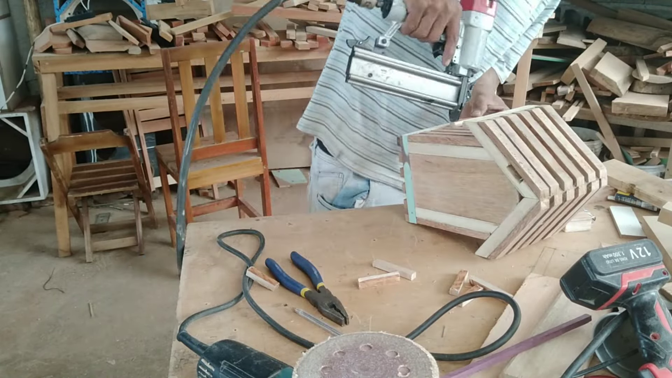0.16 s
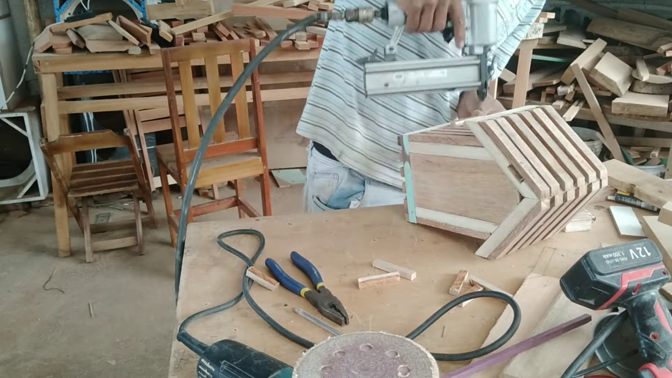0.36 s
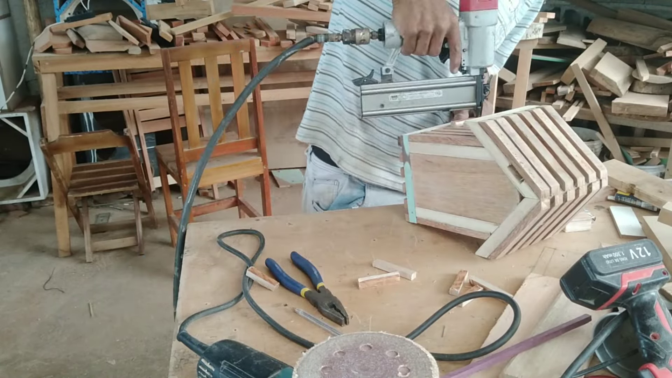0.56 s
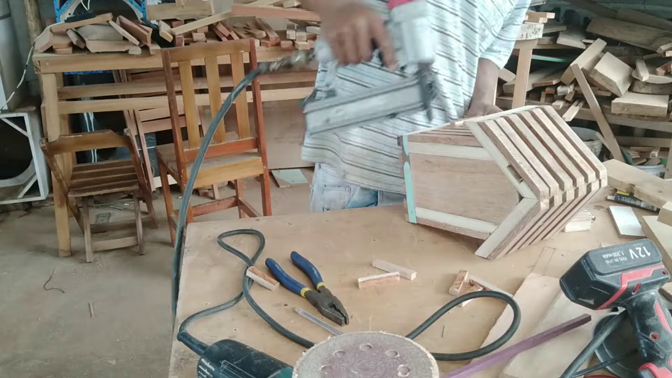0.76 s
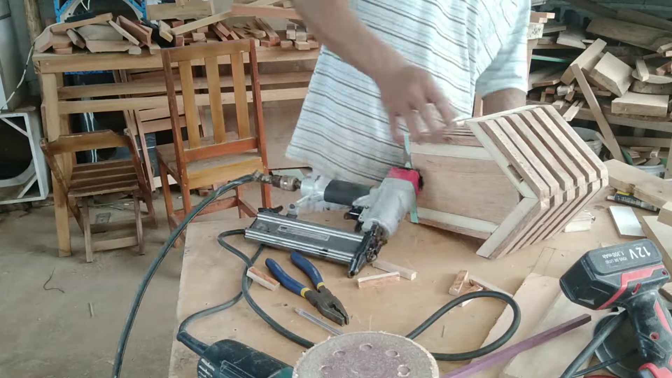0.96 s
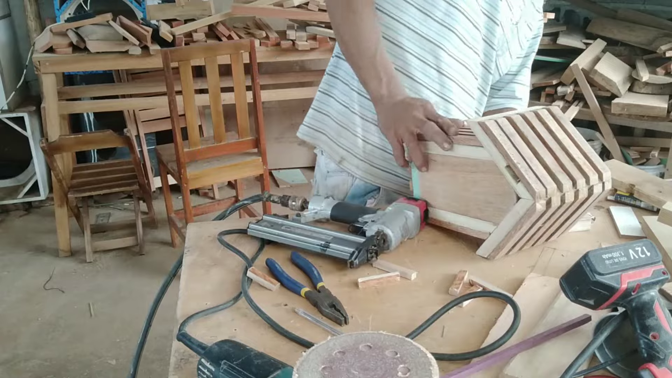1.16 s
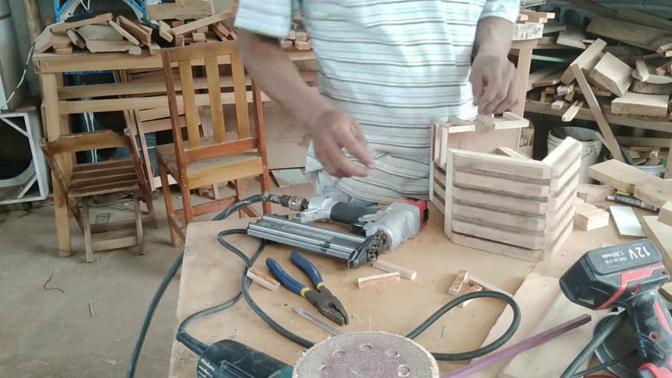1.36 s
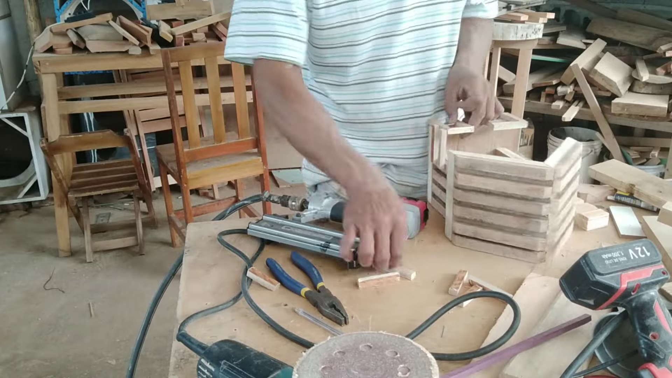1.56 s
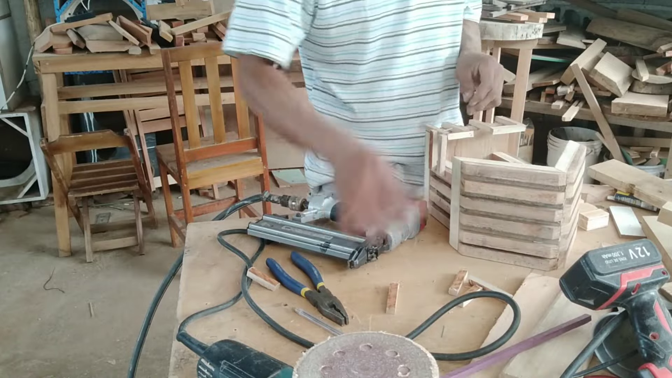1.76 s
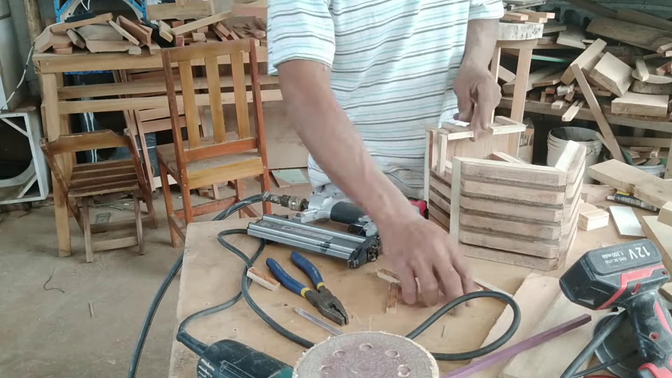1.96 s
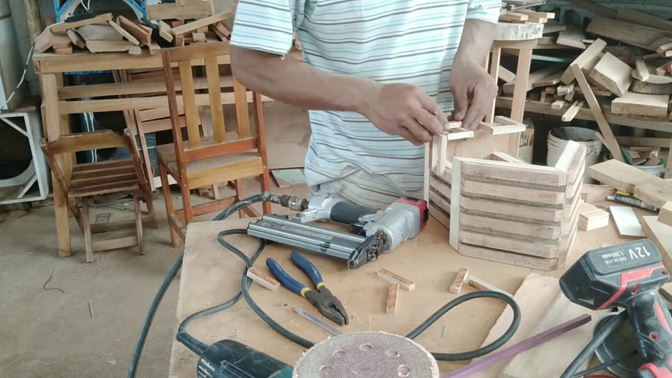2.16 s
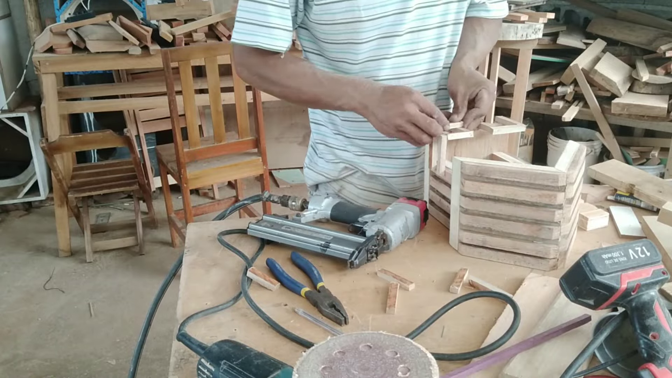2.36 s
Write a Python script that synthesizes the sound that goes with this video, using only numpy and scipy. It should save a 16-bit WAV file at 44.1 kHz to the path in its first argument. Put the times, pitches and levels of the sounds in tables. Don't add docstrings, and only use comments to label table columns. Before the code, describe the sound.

A pneumatic nailer fires twice, close and overloading, with hissing air and short shed echoes; it clunks onto the bench, then a slatted wooden box tips and lands with hollow knocks and rattling over faint machine rumble.

```python
import sys
import numpy as np
from scipy import signal
from scipy.fft import rfft, irfft
from scipy.io import wavfile
from scipy.ndimage import uniform_filter1d

SR = 44100
rng = np.random.default_rng(int(sys.argv[2]) if len(sys.argv) > 2 else 0)


def amplitude_ratio(level_db):
    exponent = np.asarray(level_db, float) / 20
    return 10 ** exponent


def dump(signal):
    limited = np.clip(np.atleast_2d(signal).T, -1, 1)
    pcm = np.round(limited * 32767).astype(np.int16)
    wavfile.write(sys.argv[1], SR, pcm)


N = 110250


def read(points, hz, axis=1):
    points = np.array(points)
    return np.interp(np.log(hz + 1), np.log(points[:, 0] + 1), points[:, axis])


def evened(x):
    return x / np.sqrt(np.mean(x ** 2) + 1e-20)


def add(mix, start_s, sound):
    part = mix[:, round(start_s * SR):][:, :sound.shape[1]]
    part += sound[:, :part.shape[1]]


def coloured(x, colour, peaks=(), lift_db=0):
    hz = abs(np.fft.fftfreq(4096, 1 / SR))
    level_db = read(colour, hz)
    for peak_hz, width_hz in peaks:
        level_db = level_db + lift_db / (1 + (2 * (hz - peak_hz) / width_hz) ** 2)
    log_gain = np.log(amplitude_ratio(level_db))
    phase = -signal.hilbert(log_gain).imag
    taps = np.fft.ifft(np.exp(log_gain + 1j * phase)).real[:2048]
    return evened(signal.oaconvolve(x, taps[None], axes=1)[:, 2048:x.shape[1]])


def piece(row, colour, grit, clicks_per_s, edge_s, dull_db, peaks=(), lift_db=0):
    start, length, level_db, change_db = row
    t = np.arange(0, length + 2 * edge_s, 1 / SR)
    air, size = rng.standard_normal((2, 2, 12288))
    struck = rng.random(12288) < clicks_per_s / SR
    clicks = size * struck * np.sqrt(SR / clicks_per_s)
    source = (1 - grit) * air + grit * clicks
    sound = coloured(source[:, :len(t) + 2048], colour, peaks, lift_db)
    low = signal.sosfiltfilt(signal.butter(2, 3500, fs=SR, output="sos"), sound)
    sound = low + (sound - low) * amplitude_ratio(dull_db * (.5 - t / length))
    gate = np.clip(np.minimum(t, t[-1] - t) / (2 * edge_s), 0, 1)
    return start - edge_s, sound * gate * amplitude_ratio(level_db + change_db * t / length)


def knock(start, level_db, ring_hz, t60):
    t = np.arange(0, t60, 1 / SR)
    hz = ring_hz * np.array([[1], [1.07]])
    overtone = np.sin(2 * np.pi * 2.4 * hz * t) * amplitude_ratio(-90 * t / t60)
    body = np.sin(2 * np.pi * hz * t) + .5 / (1 + ring_hz / 500) * overtone
    onset = 1 - np.exp(-(t * ring_hz * 5) ** 2)
    return start, body * amplitude_ratio(level_db - 60 * t / t60) * onset


def tones(start, length, lines, waver):
    t = np.arange(0, length, 1 / SR)
    bend = t + waver * np.sin(2 * np.pi * 14 * t) / 14
    out = 0
    for hz, level_db in lines:
        out = out + amplitude_ratio(level_db + 9) * np.sin(2 * np.pi * (hz * bend + rng.random((2, 1))))
    flutter = 1 + 0.28 * evened(uniform_filter1d(rng.standard_normal(len(t)), size=400))
    return start, out * flutter * np.sin(np.pi * t / length) ** 1.1


def pieces(rows, *how):
    out = np.zeros((2, N))
    for row in rows:
        add(out, *piece(row, *how))
    return out


def knocks(rows):
    out = np.zeros((2, N))
    for row in rows:
        add(out, *knock(*row))
    return out


def lumps(width):
    return evened(uniform_filter1d(uniform_filter1d(rng.standard_normal(N), width), width))


# time in seconds, level in dB.
MACHINE = [(0, -47.5), (.7, -50), (1.02, -50), (1.09, -78.5), (1.25, -78), (1.39, -68), (1.42, -79),
           (1.54, -72.5), (1.6, -61), (1.68, -60), (1.72, -61.5), (1.78, -57.5), (1.82, -56.5), (1.93, -59),
           (1.97, -54), (2.03, -68.5), (2.09, -87), (2.5, -82)]
# frequency in Hz, level in dB.
MACHINE_COLOUR = [(150, -28), (300, -13), (560, -8), (1200, -10.5), (2600, -13), (3100, -19.5),
                  (6000, -33.5), (7500, -41), (14000, -58)]
SHED = [(20, -8.5), (35, -16), (70, -7.5), (170, -18.5), (350, -28), (800, -30), (1000, -42.5),
        (2600, -56.5), (3500, -76), (16000, -83.5)]
# frequency in Hz, width in Hz.
CASING = [(565, 45), (1280, 100), (2480, 310)]


def far_machine():
    level_db = np.interp(np.arange(N) / SR, *np.transpose(MACHINE))
    hiss, rumble = rng.standard_normal((2, 2, N + 2048))
    rumble_db = -48 + 0.12 * (level_db - level_db.min()) + 0.61 * lumps(1500)
    out = coloured(hiss, MACHINE_COLOUR, CASING, 4.0) * amplitude_ratio(level_db + 4 + 1.1 * lumps(500))
    return out + coloured(rumble, SHED) * amplitude_ratio(rumble_db)


# start in seconds, length in seconds, level in dB, change over the length in dB.
FAR = [
    (.102, 0.042, -44.5, -1.5),
    (.438, 0.012, -43, -14.5),
    (1.548, 0.024, -61.5, 9),
    (1.742, 0.02755, -41, 0.5),
    (1.9418, 0.0187, -35, 2),
]
# frequency in Hz, level in dB.
FAR_COLOUR = [(150, -51), (400, 2.5), (2000, -2), (4400, -16.5), (5200, -13.5), (7500, -35.5), (9500, -30),
              (12500, -71)]
# start in seconds, length in seconds, level in dB, change in dB.
TICKS = [
    (.44, .004, -58, -3),
    (1.9435, .003, -46, -3),
    (2.449, .004, -72, -3),
]


def far_shots():
    out = pieces(FAR, FAR_COLOUR, 0.56, 1300, 0.0017, 1.9)
    for row in TICKS:
        add(out, *piece(row, FAR_COLOUR if row[0] > 1 else VALVE, 0.51, 1400, .001, .1))
    return out


# start in seconds, length in seconds, partial in Hz, level in dB.
HORN = [
    (2.413, .058, 760, -58),
    (2.425, .037, 1490, -65),
    (2.462, .033, 1490, -68),
    (2.45, .04, 1116, -75),
]


def far_horn():
    out = np.zeros((2, N))
    for start, length, hz, level_db in HORN:
        add(out, *tones(start, length, [(hz, level_db)], .003))
    return out


# start in seconds, length in seconds, level in dB, change in dB.
SETTLING = [
    (1.09, 0.169, -55.5, -3.5),
    (1.388, 0.15, -67.5, 8.5),
    (2.012, 0.066, -56.5, -3.5),
    (2.249, 0.026, -61.5, 1.5),
    (2.429, 0.05, -58.5, -4),
]
# frequency in Hz, level in dB.
SETTLING_COLOUR = [(200, -15), (500, -2.5), (1000, -5.5), (1700, -13), (2600, -35.5), (4000, -49)]


def box_settling():
    return pieces(SETTLING, SETTLING_COLOUR, 0.19, 300, 0.016, .1)


# start in seconds, length in seconds, level in dB, change in dB.
RATTLES = [
    (1.027, 0.028, -22, 0.5),
    (1.056, 0.043, -28.5, -18),
    (1.259, 0.063, -42.5, 2.5),
    (1.3, 0.02, -26, 3.5),
    (1.323, .028, -17.5, -2),
    (1.353, 0.033, -32, -11.5),
    (1.586, 0.038, -43.5, 4),
]
# frequency in Hz, level in dB.
RATTLE = [(30, -34.5), (60, 0), (230, -4.5), (1000, -17.5), (2100, -26.5), (4300, -43.5), (6000, -47),
          (9500, -60), (14000, -88)]


def slat_rattles():
    slats = [(610, 55), (980, 35), (2100, 80)]
    return pieces(RATTLES, RATTLE, 0.5, 330, 0.0023, -2, slats, 6.1)


# start in seconds,
# level in dB, ring in Hz, 60 dB decay in seconds.
KNOCKS = [(0.816, -32, 118, 0.087), (.8795, -25.5, 540, 0.0186), (.881, -22, 1080, 0.047),
          (0.8937, -29.5, 475, 0.015), (0.899, -29, 126.3, 0.25), (1.0273, -27.5, 121, .04),
          (1.0285, -25, 1554, 0.021), (1.031, -22.5, 684, 0.027), (1.037, -22.5, 453, 0.016),
          (1.0335, -29, 2010, 0.026), (1.043, -31.5, 2100, 0.02), (1.0475, -14.5, 235, 0.029),
          (1.0522, -22, 120, 0.1), (1.061, -28.5, 603, .03), (1.0627, -22.5, 274, 0.025),
          (1.068, -25.5, 198, 0.036), (1.181, -40, 890, 0.027), (1.263, -22, 640, 0.013),
          (1.268, -33, 665, 0.11), (1.304, -41, 2220, 0.016), (1.3068, -17.5, 617, 0.014),
          (1.317, -11.5, 400, 0.0097), (1.302, -14.5, 127.7, 0.077), (1.323, -7.5, 235, 0.03),
          (1.326, -9, 474.6, 0.032), (1.3265, -6, 186, 0.06), (1.3326, -11.5, 380, 0.018),
          (1.3345, -14.5, 772, 0.037), (1.3437, -9.5, 283, 0.0096), (1.351, -17.5, 332, .02),
          (1.5863, -20.5, 510, 0.0097), (1.944, -31, 1470, .015), (1.951, -34, 2700, .012)]


def box_knocks():
    return knocks(KNOCKS)


# start in seconds, length in seconds, level in dB, change in dB.
LAID = [
    (.8795, 0.0175, -25, -1.01),
]
# frequency in Hz, level in dB.
LAID_COLOUR = [(35, -28.5), (60, 9), (397, -5.5), (1110, -7.5), (1810, -18), (6250, -27.5), (15900, -49)]


def nailer_laid_down():
    return pieces(LAID, LAID_COLOUR, .4, 700, .0012, -5, [(1107, 300), (662, 71)], 6)


# start in seconds, length in seconds.
RING = (.912, .034)
# frequency in Hz, level in dB.
RING_LINES = [(4194, -64.5), (9146, -64.5), (13792, -85)]


def magazine_spring():
    out = np.zeros((2, N))
    add(out, *tones(*RING, RING_LINES, 0.00038))
    return out


# start in seconds, length in seconds, level in dB, change in dB.
ECHOES = [
    (.296, 0.044, -21.5, -28),
    (.7095, 0.053, -25, -32),
]
# frequency in Hz, level in dB.
ECHO = [(35, -33.5), (60, -1.5), (591, -11), (2240, -8.5), (2700, -11.5), (8660, -28), (12000, -42.5),
        (15900, -71)]


def shed_echoes():
    return pieces(ECHOES, ECHO, .1, 900, .0015, 8)


# start in seconds, length in seconds, level in dB, change in dB.
VALVES = [
    (.231, 0.017, -31, 3.5),
    (.2548, 0.017, -24, 0),
    (.652, 0.0073, -30, 4.5),
    (.662, 0.028, -19.5, -4.5),
]
# frequency in Hz, level in dB.
VALVE = [(35, -36.5), (60, -6), (1140, -6), (2040, -5.5), (2820, 3.5), (14100, -19.5), (15900, -32.5)]
RECOIL = [(35, -29.5), (60, 9.5), (397, -11), (1940, -0.5), (3330, -11.5), (7000, -21.5), (10000, -36.5),
          (15900, -56)]


def valves_and_recoils():
    out = pieces(VALVES[0::2], VALVE, 0.41, 1500, .0012, .1)
    return out + pieces(VALVES[1::2], RECOIL, 0.41, 1500, .0012, .1)


# start in seconds, length in seconds, level in dB, change in dB.
BLOW = [
    (.2402, 0.003, -18, 0),
    (.2445, 0.011, -4, -3.5),
]
# frequency in Hz, level in dB.
BLOW_COLOUR = [(35, -32.5), (60, -7), (900, -1.5), (5060, -22), (5960, -19), (7710, -34.5), (15900, -39.5)]
# frequency in Hz, width in Hz.
GUN = [(334, 200), (662, 83), (1330, 230), (1720, 50)]


def driver_blow():
    return pieces(BLOW, BLOW_COLOUR, .4, 900, .0007, 3, GUN, 4)


# start in seconds, length in seconds, level in dB, change in dB.
BLASTS = [
    (.2745, .022, -11.5, -2),
    (.6825, .027, -10, -3.5),
]
# frequency in Hz, level in dB.
BLAST = [(18, -36), (30, -10), (1180, -8), (2000, -9), (2530, -10.5), (8690, -16.5), (13500, -25.5),
         (15900, -46)]


def exhaust_blasts():
    return pieces(BLASTS, BLAST, .45, 600, .0008, 6)


# start in seconds, level in dB, ring in Hz, 60 dB decay in seconds.
SLAMS = [(.2335, -26, 2820, .012), (.2440, -7, 300, .03), (.2445, -8, 900, .03), (.2460, -24, 30, .2),
         (.2475, -8, 5900, .022), (.2505, -8, 1300, .025), (.2775, -12, 260, .03), (.2812, -1, 420, .03),
         (.2823, -4, 1050, .025), (.2885, -7, 1213, .03), (.2935, -14, 2500, .015), (.301, -20, 1300, .02),
         (.6585, -21.5, 2900, .015), (.6622, -14, 1616, .035), (.683, -11, 1260, .02),
         (.6835, -7, 230, .03), (.686, -20, 28, .2), (.689, -12.5, 110, .07), (.6915, -12, 1500, .015),
         (.699, -1, 500, .022), (.7006, -9, 250, .015), (.706, -10, 400, .015)]


def piston_slams():
    return knocks(SLAMS)


# frequency in Hz, likeness from 0 to 1, left over right in dB.
PAIR = [(100.5, 0.82, -0.5), (400, .85, 0.33), (890, 0.31, 5), (2600, 0.3345, 9), (5300, 0.13, -4.5),
        (11850, 0.31, 2.5)]


def scene():
    far = far_machine() + far_shots() + far_horn()
    box = box_settling() + slat_rattles() + box_knocks()
    nailer = nailer_laid_down() + magazine_spring() + shed_echoes() + valves_and_recoils()
    nailer = nailer + driver_blow() + exhaust_blasts() + piston_slams()
    direct, indirect = rfft(far + box + nailer, N + 4096, axis=1)
    hz = np.fft.rfftfreq(N + 4096, 1 / SR)
    same = np.clip(read(PAIR, hz), 0, 1)
    lean = amplitude_ratio(read(PAIR, hz, axis=2) / 2)
    lag_s = 0.00019 * hz / (hz + 300)
    left = direct * np.exp(-2j * np.pi * hz * lag_s) * lean
    right = (same * direct + np.sqrt(1 - same ** 2) * indirect) / lean
    return irfft(np.array([left, right]), axis=1)[:, :N]


def roll_off(x):
    return signal.sosfilt(signal.butter(12, 16040, fs=SR, output="sos"), x)


def record(dry):
    clipped = np.clip(dry, -1, 1)
    hissing = clipped + amplitude_ratio(-92.5) * rng.standard_normal(dry.shape)
    band = signal.firwin(511, 16000, window=("kaiser", 9), fs=SR)
    limited = signal.oaconvolve(hissing, band[None], "same")
    return roll_off(np.clip(limited, -1, 1))


dry = scene()
out = record(dry)
dump(out)
```